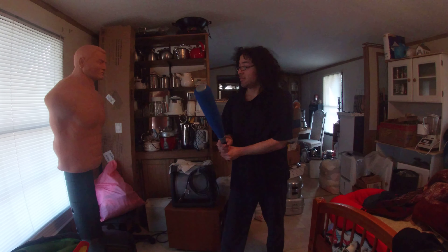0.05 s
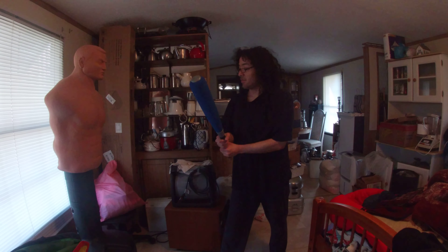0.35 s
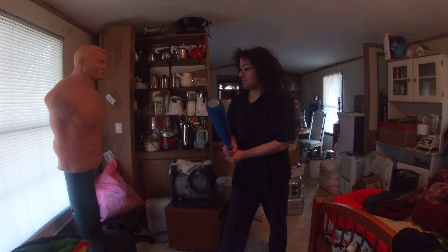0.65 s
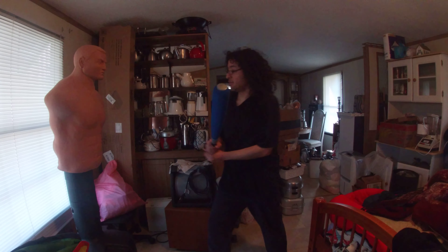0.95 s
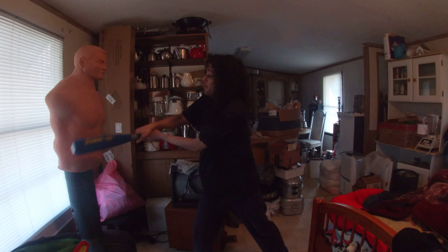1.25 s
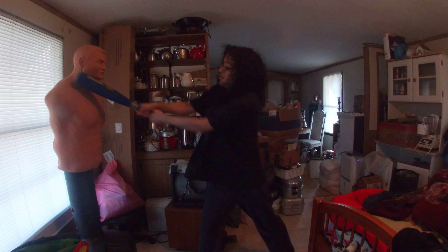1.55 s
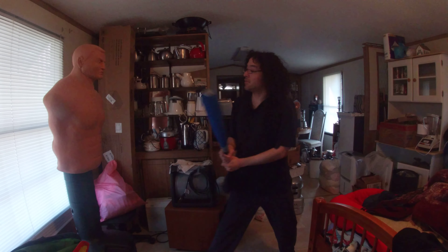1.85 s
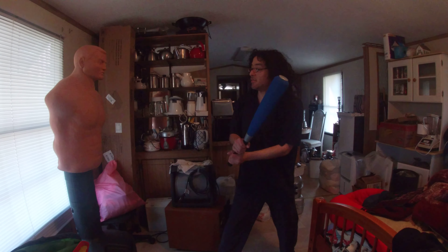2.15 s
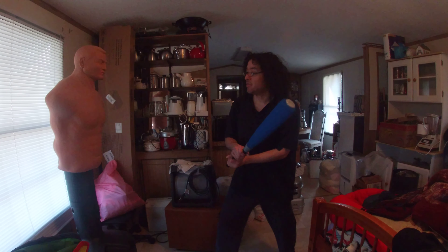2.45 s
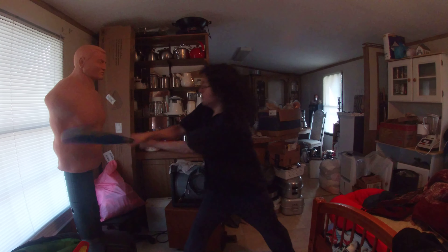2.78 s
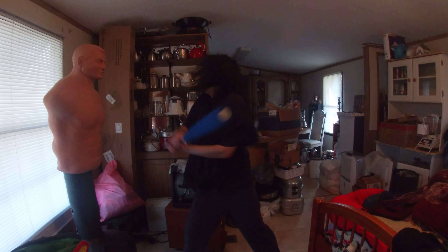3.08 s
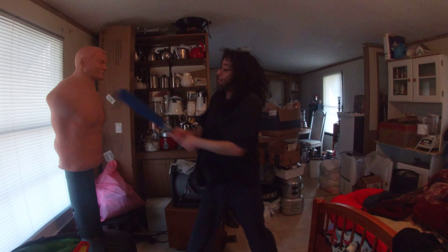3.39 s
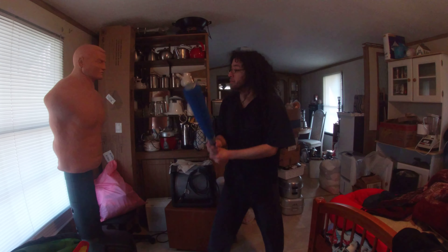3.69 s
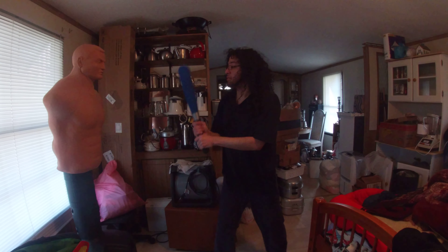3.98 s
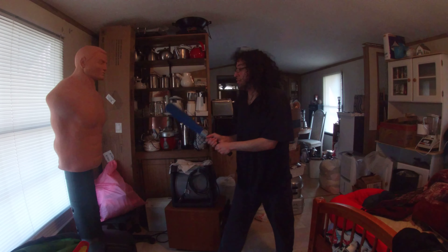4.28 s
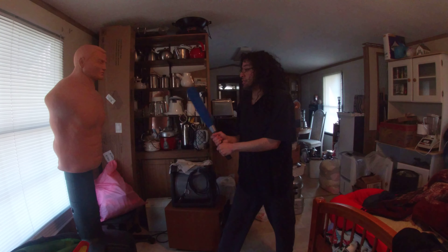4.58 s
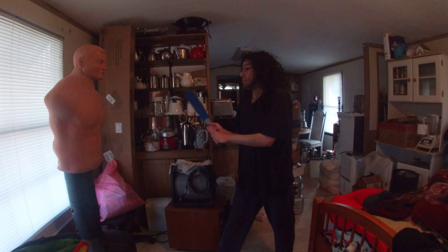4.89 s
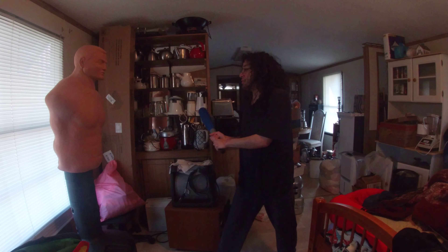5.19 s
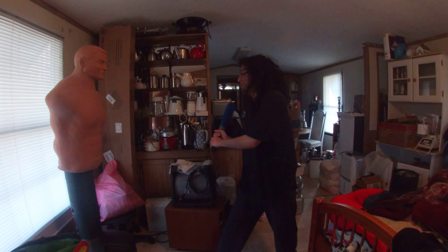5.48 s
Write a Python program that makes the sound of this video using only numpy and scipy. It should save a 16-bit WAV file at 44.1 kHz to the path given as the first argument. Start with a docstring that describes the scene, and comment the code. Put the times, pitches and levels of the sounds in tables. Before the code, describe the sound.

In a small room with a faint appliance hum, cloth rustles and a plastic bat swishes into a rubber dummy: four loud, hollow smacks in two quick pairs. Each blow booms briefly and sets glasses clinking lightly on nearby shelves. Feet shift on the wooden floor between the pairs, and a few softer scuffs and steps follow the last hit.

```python
"""A hollow plastic bat hits a free-standing rubber training dummy four times, in two forehand-backhand
pairs. Each swing rustles a shirt and pushes air; each blow cracks on the skin, thuds in the torso and
rings the barrel and a small cluttered room. The dummy rocks and glassware tinkles on the shelves.
Feet scuff and thump on the floorboards between and after the swings, over a faint appliance hum."""
import sys
import numpy as np
from scipy import signal
from scipy.fft import rfft, irfft, next_fast_len
from scipy.io import wavfile
from scipy.ndimage import uniform_filter1d

SR = 44100
rng = np.random.default_rng(int(sys.argv[2]) if len(sys.argv) > 2 else 0)


def log_audio(samples):
    """Write samples as a 16-bit WAV file to the path given in sys.argv[1]."""
    # one column per channel
    frames = np.atleast_2d(samples).T
    # limit to full scale, then quantise
    limited = np.clip(frames, -1, 1)
    pcm = np.round(limited * 32767).astype(np.int16)
    wavfile.write(sys.argv[1], SR, pcm)


N = 253134
TIME = np.arange(N) / SR
RING_TIME, SHORT_TIME = TIME[:int(1.5 * SR)], TIME[:SR // 2]

# appliance tones: (frequency [Hz], level [dB])
HUM_TONES = [(59.2, -63), (220.7, -64.5), (285.3, -70), (328.4, -78.5), (581.4, -84), (726.7, -73.5),
             (6024, -86)]
# still air of the room: (frequency [Hz], gain [dB])
AIR_EQ = [(20, -12), (35, -10), (55, 2), (85, -18), (125, -8.5), (220, -5), (330, -9.5), (700, -17.5),
          (1400, -26), (6200, -31.5), (9800, -36), (11000, -50.5), (16000, -56.5)]
# arms rubbing the shirt: (start [s], length [s], level [dB], flap offset [dB])
ARM_MOVES = [(0.18, 0.24, -70.5, -3.5), (0.825, 0.097, -68.5, -1.5), (0.966, 0.24, -65.5, -3),
             (1.081, .12, -54.5, 5), (1.952, 0.19, -62, 2.5), (2.54, 0.19, -66.5, 2),
             (2.77, 0.07, -46.5, 0.5), (3.639, 0.28, -64, 3.5), (4, .045, -56, -11),
             (5.132, .11, -67.5, -1), (5.628, 0.22, -66, -5)]
# bright slide of cloth: (frequency [Hz], gain [dB])
HISS_EQ = [(1000, -17), (3000, -0.5), (4500, -2), (6500, -4), (9600, -0.5), (10800, -19), (14500, -29),
           (16000, -47.5)]
# darker flap of loose cloth: (frequency [Hz], gain [dB])
FLAP_EQ = [(150, -1), (550, -3), (900, -4.5), (1600, -0.5), (3000, -11.5), (6000, -31.5), (12000, -40.5)]
# weight shifts that flex the floor: (time [s], level [dB])
LUNGES = [(1.235, -36.5), (2.01, -45.5), (2.885, -43), (3.712, -37.5)]
# bat hits: (time [s], height [0 belly to 1 shoulder], thud [dB], thud pitch [ratio], boom length [ratio],
# crack [dB], crack treble [dB], barrel over crack [dB], barrel pitch [ratio], slap reverb send [dB],
# slap reverb treble [dB])
BLOWS = [(1.3161, 0.25, 0.5, 1.044, 1.54, -4, 2, 0, 0.97, 4.5, -1.5),
         (1.6074, 0.8, -2.5, 0.9, 1.46, -5, 0, 1.5, 0.89, -1.5, 0.5),
         (2.9289, 0.011, -0.5, 1.0, 1.4, 0, 4, 0, 1.0, 3, 1),
         (3.3463, 1, -2.5, 1.02, 1.37, -2.5, -1, 2.5, .9, 0.5, -2.5)]
# plastic slapping rubber: (frequency [Hz], gain [dB])
SLAP_EQ = [(150, -10.5), (500, 2), (800, 0), (1400, 2), (2600, -7), (5000, -7.5), (7000, -1), (9500, -4.5),
           (10800, -26.5), (14000, -28.5), (16000, -47)]
# extra colour of a slap on the hollow shoulder: (frequency [Hz], gain [dB])
SHOULDER_EQ = [(380, -3.5), (560, 4.5), (800, -6), (1200, 2), (1600, 2), (2200, 1), (2800, 1.5), (4100, 1),
               (5300, 2), (6700, -1), (8500, 0)]
# torso, stand and floor: (frequency [Hz], level at belly [dB], level at shoulder [dB], base t60 [s])
BODY_MODES = [(48, -16, -29.5, 0.58), (61.34, -30, -16.5, 0.36), (93.6, -21.5, -26, 0.37),
              (124.3, -19.5, -22, 0.32), (120, -29, -7.5, 0.089), (133, -26, -31, 0.19),
              (186, -10.5, -18, 0.12), (216, -28, -29, 0.21), (250.5, -21.5, -25.5, 0.24),
              (306, -25, -24, 0.056), (319, -32.5, -30.5, 0.26), (387.4, -24.5, -21.5, 0.091)]
# hollow barrel of the bat: (frequency [Hz], level [dB], t60 [s])
BARREL_MODES = [(312, -11.5, 0.024), (610, -22.5, 0.01), (950, -18, 0.02), (1310, -3, 0.0067),
                (1530, -18, 0.013), (2135, -16, 0.031), (5414, -17, 0.018)]
# reflections off floor, ceiling and near wall: (delay [s], gain [ratio])
REFLECTIONS = [(.0028, 0.41), (0.0089, 0.25), (0.017, .22)]
# reverb tail: (frequency [Hz], level [dB], decay time [s])
ROOM_BANDS = [(60, -5.5, 0.15), (148, 5.5, 0.42), (303, 3, 0.3), (730, 0, 0.33), (1543, -1, 0.31),
              (3330, 2.5, 0.32), (7407, -12.5, 0.31), (14000, -1.5, .25)]
# ring of the glassware: (frequency [Hz], level [dB], t60 [s])
GLASS_MODES = [(6700, -12, 0.15), (6660, -12.5, 0.15), (11200, -28, .11), (11330, -25.5, .11),
               (12770, -33.5, .11)]
# glasses touching: (time [s], level [dB])
CLINKS = [(1.40, -30.5), (1.445, -45), (1.48, -40.5), (1.674, -24), (3.041, -48), (3.114, -39),
          (3.214, -41.5), (3.41, -22), (3.503, -33.5), (3.637, -28)]
# a planted foot shifting: (time [s], scrape [dB], treble [dB], length [s], weight [dB])
SHUFFLES = [(1.571, -36, -5, .02, -41), (3.176, -35, 4.5, 0.037, -32), (3.251, -42, -17, 0.017, -40),
            (3.843, -46.5, -13, 0.093, -35.5), (4.152, -31, -12, 0.043, -42),
            (4.236, -38.5, -7, 0.027, -37.5), (4.3, -50, -3, .054, -43), (4.594, -41.5, 1.5, 0.06, -51)]
# heel, then flat sole: (sole time [s], heel lead [s], heel [dB], sole [dB], treble [dB], weight [dB])
STEPS = [(1.886, 0.018, -37.5, -38, 2, -35.5), (2.338, 0.026, -42, -41.5, -1, -40.5),
         (3.613, 0.017, -38.5, -31.5, 5.5, -29.5), (4.083, 0.022, -34.5, -31.5, 2.5, -29),
         (4.537, 0.026, -41, -37, 2, -34), (4.982, .033, -44, -45.5, -17, -39.5)]
# sole scraping the floor: (frequency [Hz], gain [dB])
SOLE_EQ = [(100, 8.5), (300, 4), (550, 7.5), (850, 5), (1250, 7.5), (1700, 2), (2500, -0.5), (4000, -8.5),
           (9500, -15.5), (11000, -35.5), (16000, -58)]
# floorboards: (frequency [Hz], level [dB], t60 [s])
BOARD_MODES = [(60, -9.5, 0.25), (126.9, -15, 0.16), (185.1, 2, 0.035), (216.4, 0, 0.074),
               (279, -16.5, 0.033), (398, -11.5, 0.055)]


def amp(db):
    """Decibels to gain."""
    return 10 ** (np.asarray(db) / 20)


def unit(x):
    """Scale to rms 1."""
    return x / np.sqrt(np.mean(x ** 2))


def add(track, s, sound):
    """Mix a sound into a track at s seconds."""
    i = max(int(s * SR), 0)
    track[i:i + len(sound)] += sound[:N - i]


def eq(x, points):
    """Minimum-phase EQ through (frequency [Hz], gain [dB]) points: nothing rings ahead of an attack."""
    size = next_fast_len(2 * len(x))
    size += size % 2
    hz, db = np.transpose(points)
    log_hz = np.log(np.arange(size // 2 + 1) * SR / size + 1)
    cepstrum = irfft(np.log(amp(np.interp(log_hz, np.log(hz), db))))
    cepstrum[1:size // 2] *= 2
    cepstrum[size // 2 + 1:] = 0
    return irfft(rfft(x, size) * np.exp(rfft(cepstrum)))[:len(x)]


def high_shelf(x, treble_db):
    """Treble up for a hard contact, down for a soft one."""
    return eq(x, [(2000, 0.0011), (6000, treble_db)])


def noise(points):
    """Coloured noise at rms 1."""
    return unit(eq(rng.standard_normal(N), points))


def drift(rate_hz):
    """Smooth random modulation at rms 1."""
    hold = int(SR / rate_hz)
    stairs = np.repeat(rng.standard_normal(N // hold + 1), hold)
    return unit(uniform_filter1d(stairs, hold)[:N])


def ease(t, seconds):
    """A smooth rise from 0 to 1 around t = 0."""
    return (1 + np.tanh(t / seconds)) / 2


def fade(t, t60):
    """Exponential decay by 60 dB in t60."""
    return np.exp(-np.log(1000) * t / t60)


def ring(modes, pitch=1, length=1):
    """Damped modes, all struck at once."""
    return sum(amp(db) * np.sin(2 * np.pi * hz * pitch * RING_TIME) * fade(RING_TIME, t60 * length)
               for hz, db, t60 in modes)


def burst(decay_s):
    """A short noise transient with an even spectrum and unit energy."""
    envelope = fade(SHORT_TIME, decay_s)
    spectrum = rfft(rng.standard_normal(len(SHORT_TIME)) * envelope)
    even = irfft(spectrum / abs(spectrum), len(SHORT_TIME)) * np.sqrt(envelope)
    return even / np.linalg.norm(even)


def room_tone(hum_db=-1, air_db=-59, waver_db=1.8, wander_cycles=0.1):
    """The bed: a wavering appliance hum over the still air of the room."""
    hum = 0
    for hz, db in HUM_TONES:
        peak = amp(db + waver_db * drift(4.9)) * np.sqrt(2)
        cycles = hz * TIME + rng.random() + wander_cycles * drift(10)
        hum += peak * np.sin(2 * np.pi * cycles)
    return amp(hum_db) * hum + amp(air_db) * noise(AIR_EQ)


def shirt_rustle(hiss_db=1, flap_db=0.5, flutter_db=1, attack_s=0.04, release_s=0.031):
    """Cloth slides on cloth with each arm movement: it swells, holds and dies away."""
    hiss, flap = np.zeros((2, N))
    for s, length, db, loose_db in ARM_MOVES:
        rub = amp(db) * ease(TIME - s, attack_s) * ease(s + length - TIME, release_s)
        hiss += rub
        flap += amp(loose_db) * rub
    cloth = amp(hiss_db) * hiss * noise(HISS_EQ) + amp(flap_db) * flap * noise(FLAP_EQ)
    return cloth * amp(flutter_db * drift(55))


def swings(whoosh_db=-27, whoosh_s=0.0091, swish_db=-50, swish_s=0.12, shoulder_db=-16):
    """Air rushes as the bat speeds up and cuts at contact; long swings at the belly swish the most."""
    whoosh, swish = np.zeros((2, N))
    for s, height, *_ in BLOWS:
        whoosh += np.exp(-abs(TIME - s) / whoosh_s) * (TIME < s)
        swish += np.exp(-abs(TIME - s) / swish_s) * (TIME < s) * amp(shoulder_db * height)
    rush = noise([(20, -11.5), (60, -2), (220, 2), (500, -19), (1500, -26.5), (5000, -49),
                  (12000, -71.5)])
    return amp(whoosh_db) * whoosh * rush + amp(swish_db) * swish * (noise(HISS_EQ) + noise(FLAP_EQ))


def floor_flex(flex_hz=34, t60_s=0.63, rise_s=0.013):
    """The whole floor gives under each lunge with a soft sub-bass throb."""
    out = np.zeros(N)
    for s, db in LUNGES:
        add(out, s, ring([(flex_hz, db, t60_s)]) * (1 - np.exp(-RING_TIME / rise_s)))
    return out


def crack(snap_s=0.0001, snap_db=7, crush_s=0.013, crush_db=10, release_s=0.004, release_db=4):
    """Air snaps out from between bat and skin, the skin crushes, and a smaller snap ends the contact."""
    u = SHORT_TIME / snap_s - 2
    snap = 2 * u * np.exp(-u ** 2)
    release = np.interp(SHORT_TIME - release_s, SHORT_TIME, burst(release_s), left=0)
    return eq(amp(snap_db) * snap + amp(crush_db) * burst(crush_s) + amp(release_db) * release, SLAP_EQ)


def slap_tone(x, height, treble_db):
    """Colour a slap by where and how hard it lands."""
    hollow = eq(x, [(hz, height * db) for hz, db in SHOULDER_EQ])
    return high_shelf(hollow, treble_db)


def thud(height, pitch, length, dent_s=0.0032, dent_db=-5, rebound_s=0.0056, rebound_db=-14,
         lag_s=0.0035, settle_s=0.22):
    """The torso dents (a dip in pressure) and springs back; the blow's height sets which modes boom."""
    dent = np.sin(np.pi * np.clip(RING_TIME / dent_s, 0, 1))
    rebound = np.sin(np.pi * np.clip((RING_TIME - dent_s) / rebound_s, 0, 1))
    punch = amp(rebound_db) * rebound - amp(dent_db) * dent
    modes = [(hz, belly_db + height * (shoulder_db - belly_db), t60)
             for hz, belly_db, shoulder_db, t60 in BODY_MODES]
    # the boom holds briefly, then dies away faster
    boom = ring(modes, pitch, length) * np.exp(-(RING_TIME / (settle_s * length)) ** 3)
    return punch, np.interp(RING_TIME - lag_s, RING_TIME, boom, left=0)


def bat_hits(slap_send_db=16.5, barrel_send_db=-3, diffuse_hz=130):
    """Each blow layers punch, barrel ring and crack up front, with the boom and the room behind."""
    direct, tails = np.zeros((2, N))
    # a small room is diffuse only above its lowest few modes
    low_cut = signal.butter(2, diffuse_hz, "high", fs=SR, output="sos")
    for (s, height, thud_db, pitch, length, crack_db, treble_db,
         barrel_db, barrel_pitch, room_db, room_treble_db) in BLOWS:
        punch, boom = amp(thud_db) * np.array(thud(height, pitch, length))
        barrel = amp(crack_db + barrel_db) * ring(BARREL_MODES, barrel_pitch)
        add(direct, s, punch + barrel)
        add(direct, s, amp(crack_db) * slap_tone(crack(), height, treble_db))
        add(tails, s, boom)
        add(tails, s, reverb(signal.sosfilt(low_cut, punch) + amp(barrel_send_db) * barrel))
        # the slap radiates all round, so the room receives its smooth overall colour
        slap_tail = slap_tone(eq(room_response(), SLAP_EQ), height, room_treble_db)
        add(tails, s, amp(slap_send_db + room_db) * slap_tail)
    return direct + early_reflections(direct) + tails


def early_reflections(x):
    """First bounces off the nearest surfaces, dulled by furniture."""
    early = sum(gain * np.interp(TIME - delay, TIME, x, left=0) for delay, gain in REFLECTIONS)
    return eq(early, [(300, 3), (1200, -4.5), (8000, -5.5)])


def room_response(build_s=0.0041, bend=1.24, scatter_db=3):
    """A dense room tail, shaped to hold briefly and then fall faster; its grain is new each time."""
    hz, db, decay_s = np.transpose(ROOM_BANDS)
    grains, sizes = rng.standard_normal((2, len(SHORT_TIME)))
    spectrum = rfft(unit(grains * amp(scatter_db * sizes)))
    log_hz = np.log(np.arange(len(spectrum)) * SR / len(SHORT_TIME) + 1)
    attack = 1 - np.exp(-(SHORT_TIME / build_s) ** 2)
    tail = 0
    for share, band_db, band_s in zip(np.eye(len(hz)), db, decay_s):
        envelope = attack * fade((SHORT_TIME / band_s) ** bend, 0.94)
        band = irfft(spectrum * np.interp(log_hz, np.log(hz), share), len(SHORT_TIME))
        tail += amp(band_db) * band * envelope / np.linalg.norm(envelope)
    return tail


def reverb(x):
    """The room's tail for a sound, fully wet."""
    return signal.fftconvolve(x, room_response())[:N]


def dummy_rocking(sway_db=-48, rise_s=0.058, t60_s=1.9):
    """The dummy sways on its base after each blow and rumbles through the floor."""
    since_hit = np.maximum(TIME - np.array(BLOWS)[:, :1], 0)
    sway = np.sum((1 - np.exp(-since_hit / rise_s)) * fade(since_hit, t60_s), axis=0)
    rumble = noise([(12, -21), (30, -1), (45, -5), (70, -19), (130, -15), (260, -26.5), (700, -50),
                    (4000, -79.5)])
    return amp(sway_db) * sway * rumble


def glass_chatter(count=7, level_db=-46, lag_s=0.027, spread_s=0.15, detune=0.0065):
    """After each blow, glasses on the shelves chatter faintly at random."""
    out = np.zeros(N)
    for s, *_ in BLOWS:
        for when, pitch, size in rng.random((count, 3)):
            jingle = ring(GLASS_MODES, 1 + detune * (2 * pitch - 1), length=0.4)
            add(out, s + lag_s + spread_s * when, amp(level_db) * 2 * size * jingle)
    return out


def glass_clinks(tick_db=10, send_db=-2, detune=0.0042):
    """Shaken shelves make glasses touch: a small tick and a high ring."""
    out = np.zeros(N)
    for s, db in CLINKS:
        tick = eq(burst(0.03), [(1500, -24), (5000, 4.5), (9000, -5), (12000, -9), (16000, -29.5)])
        add(out, s, amp(db) * ring(GLASS_MODES, 1 + detune * rng.standard_normal()))
        add(out, s, amp(db + tick_db) * tick)
    return out + amp(send_db) * reverb(out)


def foot_scuffs(level_db=-1, grit_db=4, attack_share=0.08, heel_s=0.038, sole_s=0.041,
                heel_treble_db=-9, send_db=-6):
    """Shoes scrape grittily on the floor: shuffles, and steps with a dull heel ahead of the sole."""
    out = np.zeros(N)
    scuffs = [row[:-1] for row in SHUFFLES]
    for s, lead_s, heel_db, sole_db, treble_db, _ in STEPS:
        scuffs.append((s - lead_s, heel_db, treble_db + heel_treble_db, heel_s))
        scuffs.append((s, sole_db, treble_db, sole_s))
    for s, db, treble_db, length in scuffs:
        grains, sizes = rng.standard_normal((2, len(SHORT_TIME)))
        envelope = (1 - np.exp(-SHORT_TIME / (attack_share * length))) * fade(SHORT_TIME, 2 * length)
        scrape = amp(db + level_db) * high_shelf(grains * amp(grit_db * sizes) * envelope, treble_db)
        add(out, s, scrape)
        add(out, s, amp(send_db) * reverb(scrape))
    return eq(out, SOLE_EQ)


def foot_thumps(level_db=-2, lag_s=0.016, attack_s=0.0015, detune=0.03, send_db=-5):
    """Just after the sole scrapes, the weight comes down and rings the boards."""
    out = np.zeros(N)
    attack = 1 - np.exp(-RING_TIME / attack_s)
    for s, *_, weight_db in STEPS + SHUFFLES:
        boards = ring(BOARD_MODES, 1 + detune * rng.standard_normal())
        add(out, s + lag_s, amp(weight_db + level_db) * boards * attack)
    return out + amp(send_db) * reverb(out)


def scene(clink_db=-7, chatter_db=2):
    """The mono mix: shelves, bat and dummy, and the player's movement over the room tone."""
    shelves = amp(clink_db) * glass_clinks() + amp(chatter_db) * reverb(glass_chatter())
    strikes = bat_hits() + dummy_rocking() + swings()
    player = foot_scuffs() + foot_thumps() + floor_flex() + shirt_rustle()
    return (shelves + strikes + player + room_tone())[None]


def record(dry, low_cut_hz=27, high_cut_hz=15600):
    """The microphone drops the deepest bass, rounds the highest peaks, dulls and cuts the top."""
    x = signal.sosfilt(signal.butter(2, low_cut_hz, "high", fs=SR, output="sos"), dry[0])
    x = x / (1 + x ** 6) ** (1 / 6)  # soft clip
    x = eq(x, [(10000, -0.5), (13000, -2), (16000, -6.5)])
    return signal.sosfilt(signal.ellip(8, 0.2, 90, high_cut_hz, fs=SR, output="sos"), x)[None]


dry = scene()
out = record(dry)
log_audio(out)
```